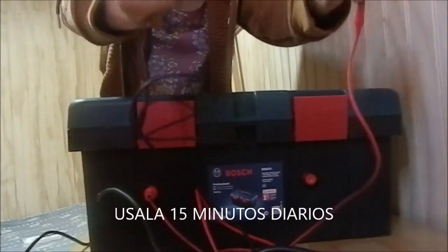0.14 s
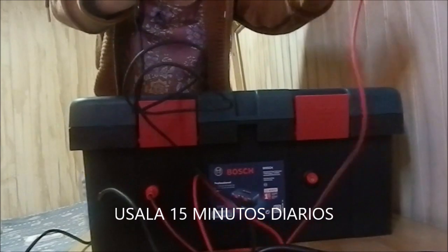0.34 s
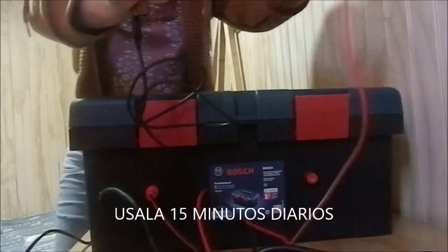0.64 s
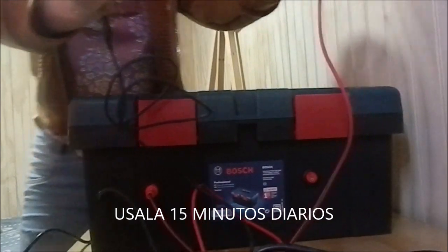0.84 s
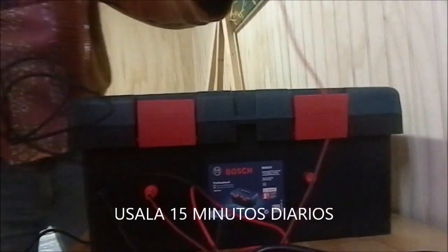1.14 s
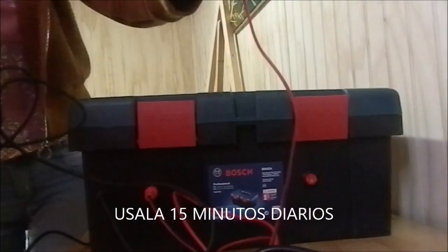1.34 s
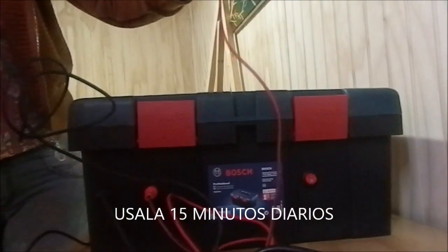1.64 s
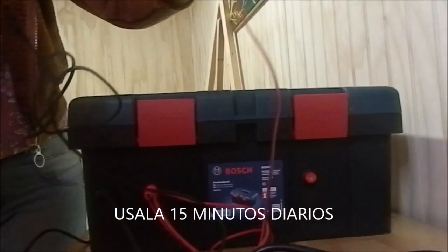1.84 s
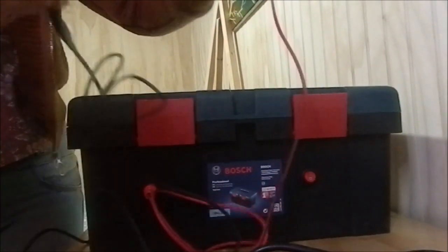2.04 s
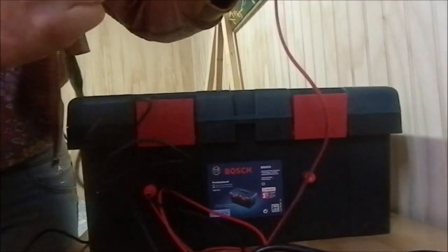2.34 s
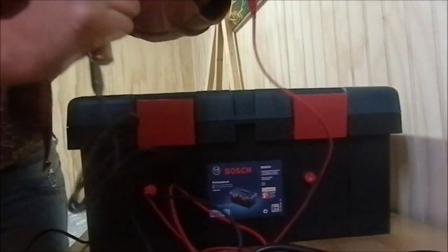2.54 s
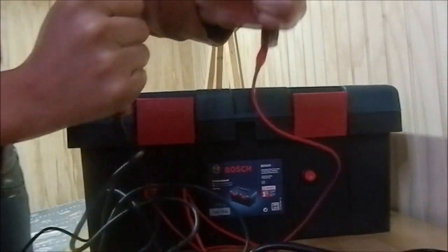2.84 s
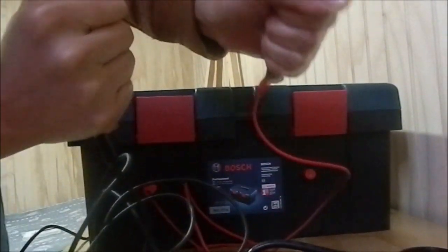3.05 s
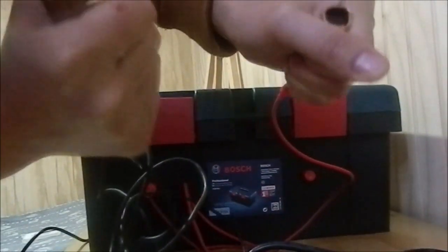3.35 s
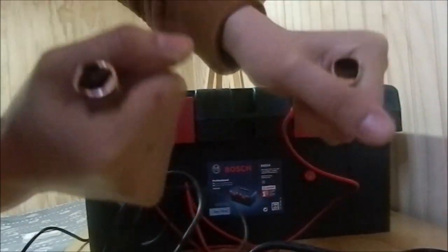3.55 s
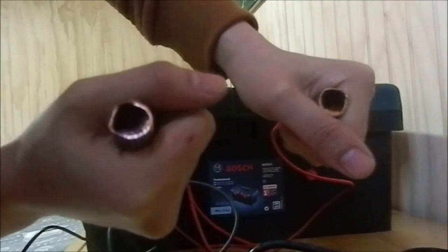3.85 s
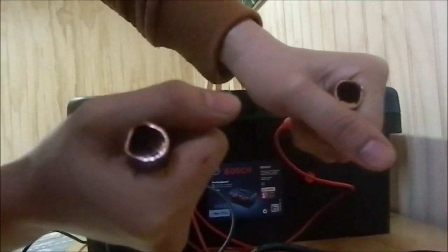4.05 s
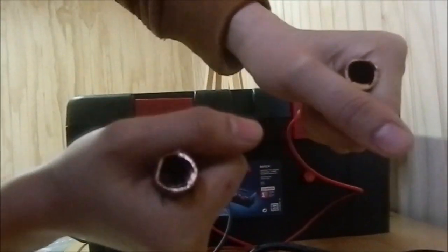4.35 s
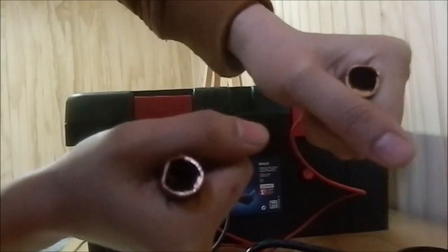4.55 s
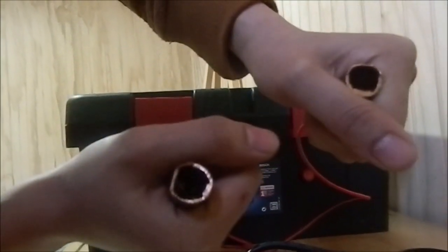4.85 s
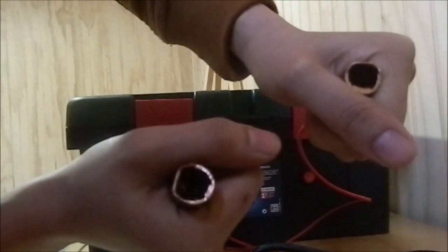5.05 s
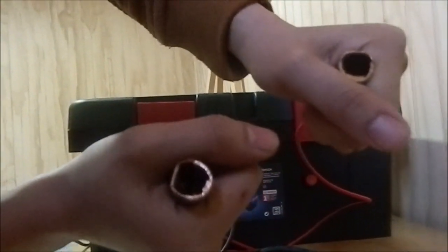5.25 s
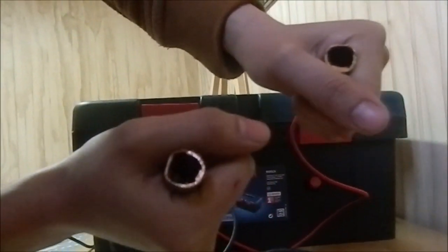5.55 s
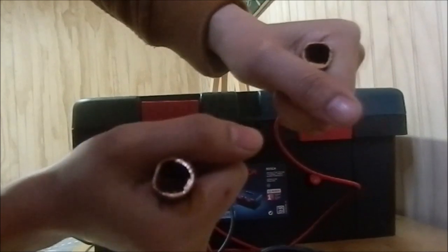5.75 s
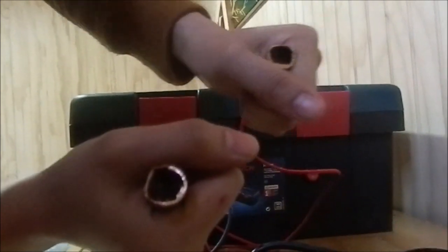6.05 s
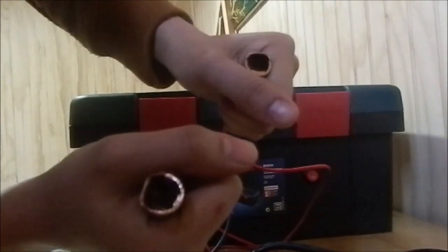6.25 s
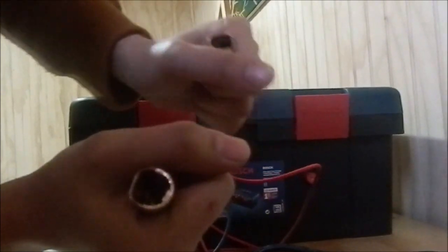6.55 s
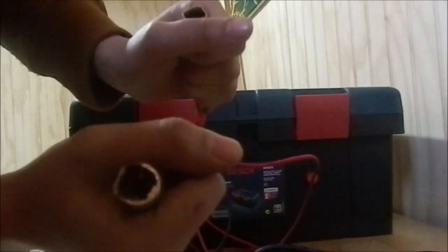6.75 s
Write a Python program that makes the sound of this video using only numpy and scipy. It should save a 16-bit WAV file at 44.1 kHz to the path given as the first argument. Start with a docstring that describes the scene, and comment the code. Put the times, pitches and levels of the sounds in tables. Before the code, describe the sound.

From 0 to about 6.9 seconds a spark gap fires without a break inside a closed plastic toolbox in a small wood-lined room. It is a harsh, dense, noisy sizzle of thousands of uneven tiny clicks, bright and raspy, with hollow, nasal box resonances around the middle and upper-middle range and no clear melody. The level stays nearly steady, with tiny falters and flares: a marked double stutter near 1.25, smaller ones near 3.4, another at 3.95, and more around 4.8 and 6.2. The tint shifts constantly as narrow bands fade and return; it brightens near 3.5 and dulls just after. Soft, deep bumps come at about 2.8, 3.5, 3.85, the strongest, and 4.5, with barely perceptible ones near 1.45 and 5.2. A weak, lumpy low rumble stays underneath. Short echoes spread the sound wide on a nearby stereo microphone. It ends still sizzling.

```python
"""A harsh, unbroken sizzle: a spark gap fires inside a closed plastic toolbox in a small wood-lined room.
Thousands of uneven one-sided clicks a second make the arc, which falters and flares.
Peaking filters and a short rattle give the box its fixed pitches; noise tails spread it in stereo.
Two bands of the sizzle change slowly in level, and narrow bands fade and return at random.
Below lie a few soft bumps, each a push into one decaying low mode, and a lumpy rumble of shaped noise."""
import sys
import numpy as np
from scipy import signal
from scipy.fft import rfft, irfft, next_fast_len
from scipy.io import wavfile

SR = 44100
rng = np.random.default_rng(int(sys.argv[2]) if len(sys.argv) > 2 else 0)


def digitize_waveform(pressure):
    """Quantize a signal to 16-bit integers and store it at the path in sys.argv[1].

    Rows of a 2-D input are taken as channels; values are limited to [-1, 1].
    """
    field = np.atleast_2d(pressure).T
    bounded = np.clip(field, -1, 1)
    quanta = np.round(bounded * 32767).astype(np.int16)
    wavfile.write(sys.argv[1], SR, quanta)


N = 303729

# slow strength of the arc, before box and room: (time [s], level [dB])
ARC_STRENGTH = [(0, -19), (.9, -20), (1.6, -18.5), (2.3, -19), (3.7, -19.5), (4.45, -18.5), (5.0, -20),
                (5.5, -18.5), (6.0, -18.5), (6.89, -18.5)]
# the arc falters, then flares as the stored charge lets go: (time [s], dip depth [dB], dip length [s])
ARC_FALTERS = [(0.066, 5, 0.019), (0.214, 4, 0.041), (0.437, 3, 0.036), (0.508, 4.5, 0.024),
               (0.79, 2.5, 0.11), (1.153, 3, 0.029), (1.234, 9, 0.043), (1.298, 8, 0.028),
               (1.352, 3.5, 0.034), (1.58, 3, 0.07), (1.806, 1.5, 0.055), (2.335, 2, 0.029),
               (2.47, 2.5, 0.024), (2.672, 3, 0.092), (3.1, 1, 0.12), (3.326, 3, 0.027), (3.37, 5.5, 0.04),
               (3.414, 6, 0.037), (3.82, 1, 0.071), (3.95, 7.5, 0.043), (4.163, 1.5, 0.2),
               (4.831, 5, 0.027), (5.006, 1, .04), (5.99, 2, 0.055), (6.105, 3, 0.042), (6.218, 5, 0.086),
               (6.513, 3, 0.15), (6.89, 2.5, 0.11)]
# broad colour of a discharge heard through the box wall: (frequency [Hz], level [dB])
WALL_COLOUR = [(100, -16.2), (170, -7.7), (330, -11.6), (600, -20.7), (900, -24.7), (1400, -32.0),
               (2000, -3.5), (2800, -4.1), (4500, -5.6), (7000, -2.6), (8500, -3.4), (11500, 0.0),
               (13500, -3.5), (15700, -7.1)]
# resonances and cancellations of the box:
# (frequency [Hz], width [Hz], gain [dB], weight of that gain in the sideways echoes [1 = same])
BOX_MODES = [(120, 40, -3, 1), (210, 16, -3, 0), (233, 22, 9, .7), (283, 30, -5, 0), (310, 40, 3, 0),
             (410, 40, -1, 6), (458, 32, 6.5, 1.7), (575, 44, -4.5, 3), (628, 36, 4, 1), (700, 93, -10, 1),
             (830, 155, 30.5, .88), (972, 36, 12.5, 1), (1085, 40, 1, 6), (1135, 161, -19.5, 1),
             (1217, 64, 14, 1), (1300, 242, 28, 1), (1449, 30, 9, .9), (1564, 80, 19, .85),
             (1703, 20, 5.4, .8), (1920, 80, 2, 2.5), (2087, 26, 10, .3), (2190, 40, -3, 0),
             (2232, 24, 4, 0), (2265, 20, -3, 0), (2296, 20, 3.5, 0), (2298, 105, 17, .75),
             (2342, 22, 4, 0), (2387, 495, -12.6, .9), (2522, 44, 12, .7), (2615, 46, -6.5, .5),
             (2745, 40, -1.5, 3), (2903, 22, 5, .8), (3060, 120, 1, 4), (3130, 40, -8, 0),
             (3282, 50, 5, .3), (3465, 24, 7.6, .3), (3627, 32, 6, .7), (3730, 90, 4, .8),
             (3835, 60, -6, 1.2), (3560, 40, -4, .5), (3960, 60, -4, 1.2), (4075, 40, 3, 0),
             (4240, 36, 5, .3), (4345, 95, -15, .7), (4565, 30, 4, .5), (4600, 250, 3.5, 1),
             (4670, 28, 7.5, .2), (4870, 90, -5, 1.1), (5100, 200, 1, 3), (5330, 50, -4, 1),
             (5432, 36, 6, .4), (5761, 30, 5, .3), (6418, 36, 6, .7), (6545, 36, 5, .3), (6771, 36, 5, .3),
             (6975, 170, 4, .3), (7680, 60, -4, 1), (8140, 40, 4, .5), (8560, 70, -6, .8),
             (8910, 90, 5, .4), (9025, 36, 6, .4), (9480, 40, 5, .5), (11229, 54, 5, .2),
             (11470, 90, 6, .1), (11706, 36, 5, .5), (11940, 90, 3, .4), (15101, 68, 5, .5)]
# small reflections inside the box, against the direct sound: (frequency [Hz], level [dB])
RATTLE_COLOUR = [(500, -30), (3500, -20), (5500, -13), (15000, -12)]
# room echoes alike in both ears, before the box colour: (frequency [Hz], level [dB])
SHARED_ECHOES = [(100, -8), (1500, -9), (3000, -4), (15000, -4)]
# room echoes opposed between the ears, before the box colour: (frequency [Hz], level [dB])
OPPOSED_ECHOES = [(60, -13), (130, -15.5), (200, -6.5), (300, -5), (450, -18.5), (620, -17), (800, -5),
                  (1200, -6), (1420, -2.5), (1900, -7), (2700, -6.5), (5000, -3), (9000, -.5), (12000, 1),
                  (15000, -1.5)]
# stereo lean: (frequency [Hz], left minus right [dB])
STEREO_LEAN = [(60, 9), (125, -4.5), (250, -2.5), (800, -3), (1500, -2), (3000, 0), (6000, -0.6),
               (15000, -1.8)]
# slow uneven level of a low and a bright band of the sizzle:
# (time [s], low band gain [dB], bright band gain [dB])
BAND_LEVELS = [(0, 4, -0.5), (.5, -0.5, -0.5), (1, 2, 1), (1.6, -2, -0.5), (2, 2.5, -1), (2.5, 2, 2),
               (2.9, 2.5, 0.5), (3.3, 3, 1), (3.55, 2.5, 3), (3.78, 0.5, -4), (4.1, 2.5, -1.5),
               (4.9, -1.5, -2.5), (5.4, 1, -1), (5.9, 0.5, -1), (6.15, 0.5, 1), (6.45, -0.5, 1),
               (6.89, 3.5, -1)]
# edges of the low band and the bright band: (low edge [Hz], high edge [Hz])
UNEVEN_BANDS = [(720, 1020), (1850, 2400)]
# narrow bands that fade and return at random: (low edge [Hz], high edge [Hz], fade depth [dB], share of time
# more than half faded [0-1])
FADING_BANDS = [(370, 420, 14, .2), (515, 600, 24, .4), (500, 720, 22, .2), (655, 745, 24, .3),
                (1040, 1190, 20, .8), (1365, 1425, 16, .3), (1745, 1810, 16, .2), (2415, 2495, 20, .35),
                (2575, 2700, 20, .35), (3095, 3165, 20, .35), (3800, 3880, 24, .3), (3950, 4030, 22, .25),
                (4280, 4410, 24, .72), (4840, 4960, 22, .3)]
# soft bumps on table or floor, before the microphone: (time [s], peak level [dB])
SOFT_BUMPS = [(1.451, -57), (2.816, -40), (3.524, -42), (3.842, -35.5), (4.53, -45), (5.194, -60)]
# spectral shape of the rumble, later scaled as a whole: (frequency [Hz], relative level [dB])
RUMBLE_SHAPE = [(15, -46), (25, -52), (65, 15), (130, -4), (170, -29), (290, -120)]
# microphone colour: (frequency [Hz], gain [dB])
MICROPHONE_COLOUR = [(30, -1.5), (150, 3), (800, 1), (2000, 0.6), (5000, 0.58), (10000, -1.97), (15700, -1)]

SPARKS_PER_S, SIZE_SPREAD_DB = 9000, 2.0
SPUTTER_DB, SPUTTER_HZ = .7, 20   # spread and speed of the random level wobble
FLARE_SHARE, FLARE_FADE_S = 0.16, 0.11   # flare scale against dip depth, before its rise and fade
RATTLE_T60_S, SHARED_T60_S, OPPOSED_T60_S = .09, 0.17, 0.23
POSTURES = 70   # changes of the echo pattern over the arc
FADING_HZ = 11   # speed of the random fading in the narrow bands
BUMP_HZ, BUMP_T60_S = 73.4, 0.44
RUMBLE_CENTRE_DB = -54.5   # middle of the rumble's level swing
CUTOFF_HZ = 15720
SIZE = next_fast_len(N + SR)   # transform length, with a spare second
HZ = np.arange(SIZE // 2 + 1) * SR / SIZE


def from_db(db):
    """Gain of a level in dB."""
    return 10 ** (np.asarray(db) / 20)


def rms_one(x):
    """Sound scaled to rms 1."""
    return x / np.sqrt(np.mean(x ** 2, axis=-1, keepdims=True) + 1e-20)


def colour(points):
    """Spectrum table in dB on the whole frequency grid, with a steep fall below its first point."""
    hz, db = np.transpose(points)
    return np.interp(np.log(HZ + 1), np.log(np.r_[5, hz]), np.r_[db[0] - 30, db])


def causal(db):
    """Minimum-phase response of a dB curve, by folding its cepstrum."""
    cepstrum = irfft(db * np.log(10) / 20, SIZE)
    cepstrum[1:SIZE // 2] *= 2
    cepstrum[SIZE // 2 + 1:] = 0
    return np.exp(rfft(cepstrum))


def drift(hz):
    """Slow random motion of spread 1: noise through a double one-pole low-pass."""
    pole = np.exp(-2 * np.pi * hz / SR)
    noise = rng.standard_normal(N + SR)
    return rms_one(signal.lfilter([1], [1, -2 * pole, pole * pole], noise))


def tail(t60):
    """Half a second of dense echoes dying away, with unit energy."""
    t = np.arange(SR // 2) / SR
    echoes = rng.standard_normal(len(t)) * from_db(-60 * t / t60) * (t > .002)
    return rms_one(echoes) / np.sqrt(len(t))


def band_of(x, low_hz, high_hz):
    """One band, filtered both ways so that it has no delay."""
    bandpass = signal.butter(2, [low_hz, high_hz], "band", fs=SR, output="sos")
    return signal.sosfiltfilt(bandpass, x)


def sparks():
    """Pressure clicks of one sign at random moments; they start a second early so the room is already full."""
    t = np.arange(-SR, N) / SR
    fired = rng.random(N + SR) < SPARKS_PER_S / SR
    clicks = fired * from_db(SIZE_SPREAD_DB * rng.standard_normal(N + SR))
    every_ms = np.arange(-1, N / SR, .001)
    strength_db = np.interp(t, every_ms, arc_level(every_ms))
    level_db = strength_db + SPUTTER_DB * drift(SPUTTER_HZ)
    return rms_one(clicks - clicks.mean()) * from_db(level_db)


def arc_level(t):
    """Arc level in dB at the times t: slow strength, with each falter a smooth dip and a flare after it."""
    at, depth_db, length = np.transpose(ARC_FALTERS)[:, :, None]
    since = np.maximum(t - at, 0)
    rise = 1 - np.exp(-(since / length) ** 2)
    flare = FLARE_SHARE * rise * np.exp(-since / FLARE_FADE_S)
    dip = np.exp(-(2 * (t - at) / length) ** 2)
    return np.interp(t, *np.transpose(ARC_STRENGTH)) + np.sum(depth_db * (flare - dip), axis=0)


def toolbox():
    """Box responses, forward and sideways: wall colour, short rattle and a peaking filter for each mode."""
    rattle_db = colour(RATTLE_COLOUR)
    rattles = [causal(rattle_db - softer_db) * rfft(tail(RATTLE_T60_S), SIZE) for softer_db in (0, 4)]
    response = causal(colour(WALL_COLOUR)) * (1 + np.array(rattles))
    for hz, width_hz, gain_db, sideways in BOX_MODES:
        damping = 1j * HZ * width_hz
        detune = hz ** 2 - HZ ** 2
        # half the gain lifts the numerator, half lowers the denominator
        gain = from_db([[gain_db / 2], [sideways * gain_db / 2]])
        response *= (detune + damping * gain) / (detune + damping / gain)
    return response


def room(x, box):
    """Direct sound plus shared and opposed tails; a person moves about, so the echoes keep changing."""
    step = len(x) // POSTURES + 1
    padded = np.pad(x, (step, 2 * step))
    fade = np.sin(np.pi * np.arange(2 * step) / (2 * step))   # overlapping fades keep the power even
    echoes = np.zeros((2, len(padded) + SR))
    for start in range(0, len(x) + step, step):
        part = padded[start:start + 2 * step] * fade
        tails = [tail(SHARED_T60_S), tail(OPPOSED_T60_S)]
        heard = signal.fftconvolve([part], tails, axes=1)
        echoes[:, start:start + heard.shape[1]] += heard
    shared, opposed = rfft(echoes[:, step:step + len(x)], SIZE)
    forward = rfft(x, SIZE) + from_db(colour(SHARED_ECHOES)) * shared
    sideways = causal(colour(OPPOSED_ECHOES)) * opposed
    mid, side = box * [forward, sideways]
    lean = from_db(colour(STEREO_LEAN) / 2)
    return np.array([(mid + side) * lean, (mid - side) / lean])


def uneven_bands(x):
    """A low and a bright band of the sizzle, each on its own slow uneven level."""
    s, *levels = np.transpose(BAND_LEVELS)
    t = np.arange(N) / SR
    for edges, level_db in zip(UNEVEN_BANDS, levels):
        gain = from_db(np.interp(t, s, level_db))
        x = x + band_of(x, *edges) * (gain - 1)
    return x


def fading_bands(x):
    """Narrow bands fade and return at random, with a gain of mean power 1."""
    spectrum, out = rfft(x, SIZE), x
    for low_hz, high_hz, depth_db, faded_share in FADING_BANDS:
        offset = (2 * HZ - low_hz - high_hz) / (high_hz - low_hz)   # -1 and 1 at the band edges
        band = irfft(spectrum * np.exp(-offset ** 6), SIZE)[:, :N]
        chance = drift(FADING_HZ)[:N]
        presence = np.tanh(2.7 * (chance - np.quantile(chance, faded_share)))   # -1 faded, 1 full
        gain = from_db(-depth_db * (1 - presence) / 2)
        out = out + band * (rms_one(gain) - 1)
    return out


def bumps():
    """Soft 12 ms pushes into one low mode, which rings on and decays."""
    s, peak_db = np.transpose(SOFT_BUMPS)
    push = np.zeros(N)
    push[(s * SR).astype(int)] = from_db(peak_db + 2.5)   # makes up for the soft push and the decay
    soft = np.hanning(round(0.012 * SR))
    pushes = np.convolve(push, soft / soft.sum())[:N] + 1e-18   # tiny offset keeps the filter off denormals
    r, w = from_db(-60 / (BUMP_T60_S * SR)), 2 * np.pi * BUMP_HZ / SR
    return signal.lfilter([0, np.sin(w)], [1, -2 * r * np.cos(w), r * r], pushes)


def rumble():
    """Low noise of the house: shaped noise, mostly alike in both ears, with a lumpy random level."""
    noise = rfft(rng.standard_normal((2, SIZE)))
    mid, side = irfft(noise * from_db(colour(RUMBLE_SHAPE)), SIZE)[:, :N]
    stereo = rms_one(mid + from_db(-6.5) * side * [[1], [-1]])
    lumps_db = 11 * np.tanh(0.65 * drift(2.9)[:N] - 0.4)
    lean_db = np.array([[-.9], [.9]])   # right a little louder
    return from_db(RUMBLE_CENTRE_DB + lumps_db + lean_db) * stereo


def scene():
    """The arc through box and room, over bumps and rumble."""
    arc = irfft(room(sparks(), toolbox()), SIZE)[:, SR:SR + N]   # drops the early second
    return from_db(3.5) * fading_bands(uneven_bands(arc)) + rumble() + bumps()


def record(dry):
    """A gentle microphone colour, then a steep cut of the top."""
    coloured = irfft(rfft(dry, SIZE) * causal(colour(MICROPHONE_COLOUR)), SIZE)[:, :N]
    top_cut = signal.ellip(12, .5, 75, CUTOFF_HZ, fs=SR, output="sos")
    return signal.sosfilt(top_cut, coloured)


dry = scene()
out = record(dry)
digitize_waveform(out)
```